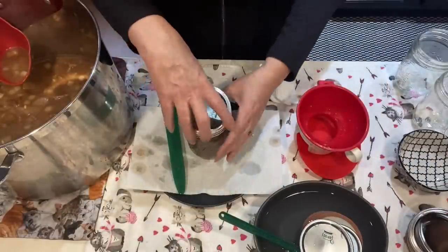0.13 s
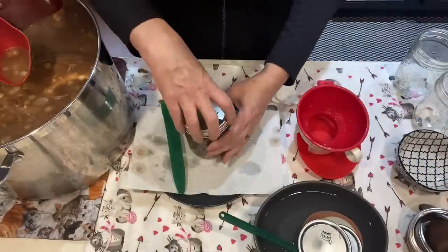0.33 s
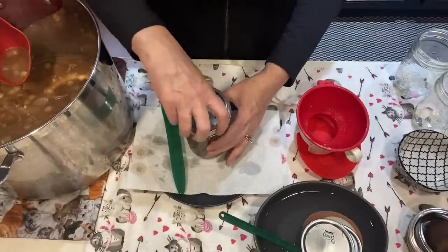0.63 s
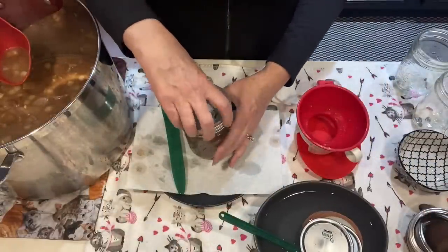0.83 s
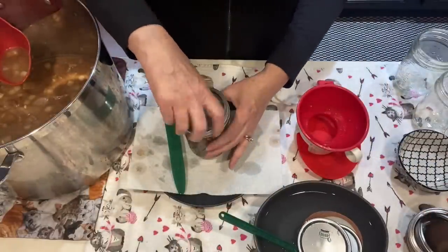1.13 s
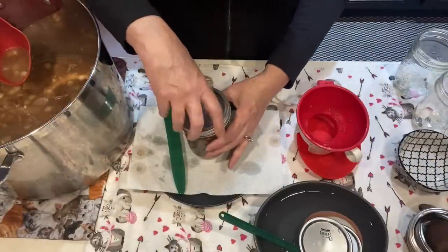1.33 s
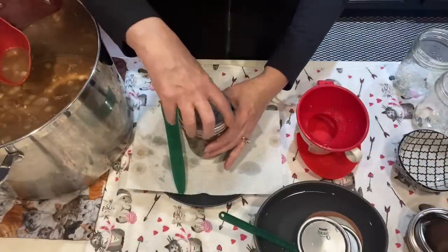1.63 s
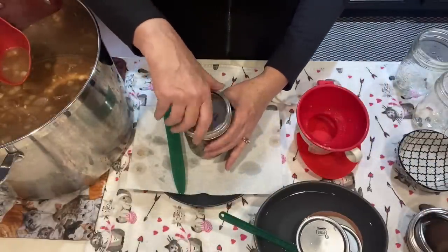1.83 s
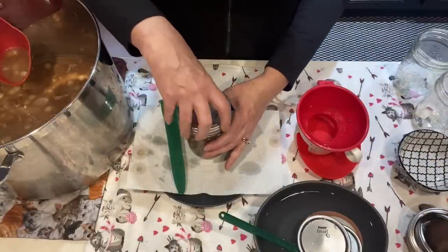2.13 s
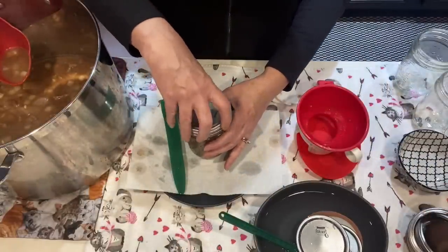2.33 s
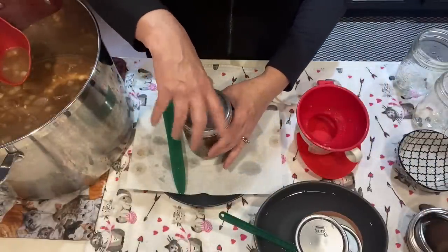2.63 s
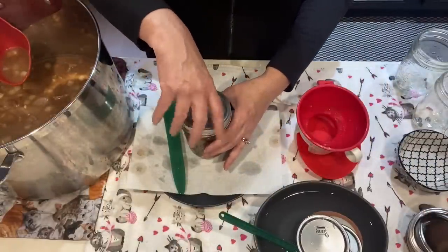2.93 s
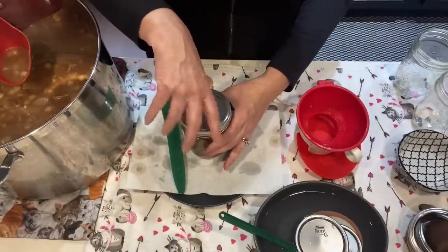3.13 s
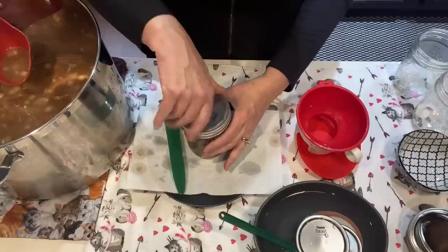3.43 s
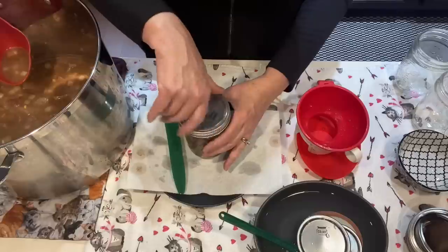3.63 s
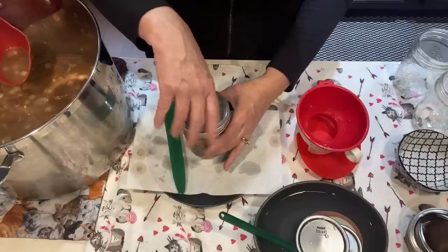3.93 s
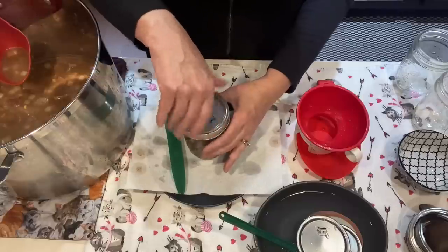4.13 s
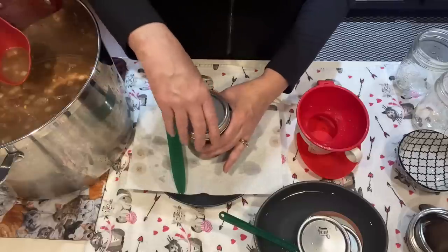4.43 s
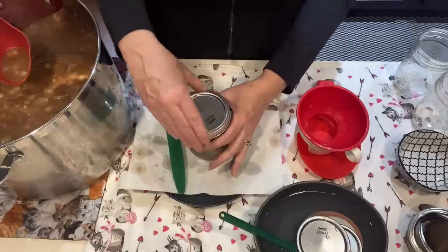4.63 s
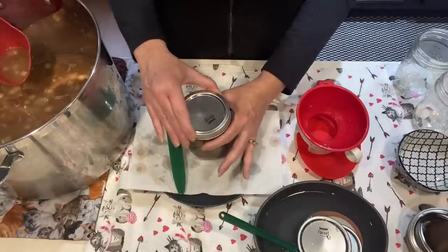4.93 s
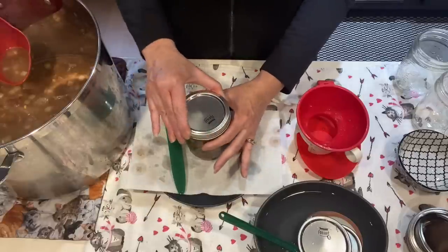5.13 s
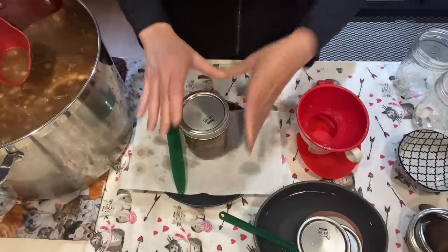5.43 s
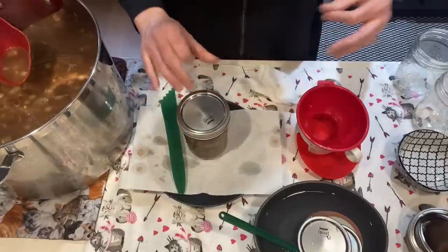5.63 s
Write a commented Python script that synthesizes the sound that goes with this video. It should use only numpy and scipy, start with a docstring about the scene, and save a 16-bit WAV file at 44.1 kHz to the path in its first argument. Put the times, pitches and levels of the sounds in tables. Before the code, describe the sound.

Quick metallic scrapes, clicks and soft thuds come from a lid being screwed onto a glass jar, while an appliance hums faintly.

```python
"""Short gritty scrapes and sharp ticks: a hand twists a metal screw band onto a full glass jar.
The band grates along the glass thread, ticks where it catches, knocks the flat lid and sometimes sings.
The jar rocks on a padded kitchen table with soft thuds. Near the end a fingernail flicks the rim
and fingertips stutter off it. A small room echoes, over the hum of an appliance and a low rumble."""
import sys
import numpy as np
from scipy import signal
from scipy.fft import rfft, irfft
from scipy.io import wavfile
from scipy.ndimage import uniform_filter1d

SR = 44100
rng = np.random.default_rng(int(sys.argv[2]) if len(sys.argv) > 2 else 0)


def digitize_waveform(pressure):
    """Quantize a signal to 16-bit integers and store it at the path in sys.argv[1].

    Rows of a 2-D input are taken as channels; values are limited to [-1, 1].
    """
    field = np.atleast_2d(pressure).T
    bounded = np.clip(field, -1, 1)
    quanta = np.round(bounded * 32767).astype(np.int16)
    wavfile.write(sys.argv[1], SR, quanta)


N = 255780

# Turns and touches of the hand:
# start_s, rise_ms, hold_ms, level_db, treble_tilt_db, lid_db, upper_lid_extra_db
TURNS = [(0, 0.92, 129, -55.5, -28, 3.5, 4.5), (0.32, 74, 5.9, -70.5, -29, 15.5, -3),
         (0.488, 130, 5.4, -50, -23, 0, -19), (.72, 30, 8.4, -62, -18, 6, -4),
         (0.958, 0.65, 102, -58, 4, 10.5, -9), (1.091, 108, 44, -39.5, -13, -5, 13),
         (1.432, 1, 29, -58, -19, 7.5, -9), (1.55, 7.8, 150, -55.5, -14, 3, -16),
         (1.685, 67, 174, -39.5, -11.5, -17, 16), (1.775, 2, 124, -54.5, -6.5, 6, 7),
         (2.068, 0.81, 82, -64, -16, 9, -3), (2.198, 4.6, 138, -65.5, -16, 8.5, 11),
         (2.31, 56, 8.3, -53.5, -26, 7, -18), (2.408, 89, 61, -36, 0, -13.5, 7),
         (2.701, 88, 39, -33, -3.5, -15, 6), (2.765, 2, 53, -47.5, -5.5, 3.5, 1),
         (2.95, 1.2, 83, -40, -15.5, -5, 7), (3.173, 11.4, 3.1, -26.5, 2, -11, 3),
         (3.375, 1, 69, -39.5, -8, -6.5, 0.5), (3.575, 18, 4, -37, -12, -2, -1.5),
         (3.795, 6.2, 14, -52, -6.5, 9.5, -9), (4.035, 1.34, 33, -60.5, 12, 8, -9.5),
         (4.29, 16.4, 3.5, -75.5, 9.5, 11, -3.5), (4.418, 3.9, 19, -65.5, -2, 1.5, -3),
         (4.538, 13, 10, -76, 3, 10, -2), (4.651, 18, 200, -68.5, -17, 4.5, -2.5),
         (5.07, 18.4, 88, -77.5, -0.5, -5.5, 2), (5.27, 64, 79, -83.5, 11, -5, 9)]
# Modes (the notes a thing rings at) of the band and of the lid: pitch_hz, width_hz, level_db
BAND_MODES = [(3100, 45, -2.5), (3520, 30, -6), (3790, 51, 2.5), (4373, 68, 0), (5010, 210, -5.5),
              (5824, 90, -7.5), (6590, 80, -1), (7050, 65, -4), (7630, 68, -5), (7800, 220, -6.5),
              (8254, 120, -1.5), (8900, 82, -2.5), (9820, 78, -5.5), (5190, 84, -6), (10720, 660, -9),
              (11440, 71, -9.5), (13300, 130, -19), (11800, 47, -13.5)]
LID_MODES = [(585, 21, -6.5), (654.3, 14, 1.5), (801.6, 13, -5), (926, 45, -2), (1008, 59, -4.5),
             (1115, 29, -13.5), (1378, 45, -12.5), (1486, 56, -11), (1862, 37, -12), (2179, 22, -1.5),
             (2100, 40, -5), (2504, 30, -11)]


def undb(db):
    """Turns decibels into a number to multiply by."""
    return 10 ** (np.asarray(db) / 20)


def level(x, db):
    """Sets the average (rms) level."""
    return x * undb(db) / np.sqrt(np.mean(x ** 2))


def ring(x, hz, width_hz):
    """Lets a sound ring at one pitch; a narrower width rings longer."""
    return signal.lfilter(*signal.iirpeak(hz, hz / width_hz, SR), x)


def ring_twice(x, hz, width_hz):
    """Keeps the sound around one pitch, with steeper edges."""
    return ring(ring(x, hz, width_hz), hz, width_hz)


def colour(x, curve):
    """Shapes bass and treble along points of pitch_hz, gain_db."""
    hz, db = np.transpose(curve)
    freqs = np.fft.rfftfreq(x.shape[-1], 1 / SR)
    return irfft(rfft(x) * undb(np.interp(np.log(freqs + 1), np.log(hz), db)), x.shape[-1])


def dull(x, top_hz=11400):
    """Takes off the highest treble, which rubbing and echoes have little of."""
    return signal.sosfilt(signal.butter(8, top_hz, fs=SR, output="sos"), x)


def wander(per_s):
    """A smooth random wobble, about 1 in size."""
    hold = int(SR / per_s)
    steps = np.repeat(rng.standard_normal(N // hold + 1), hold)
    return np.sqrt(2) * uniform_filter1d(uniform_filter1d(steps, hold), hold)[:N]


def room_air():
    """A soft rush of air, nearly the same in both ears in the bass."""
    air_spectrum = [(22, -32.5), (32, -11), (50, -6), (72, -6), (120, 0), (250, -5), (420, -3.5),
                    (600, -12.5), (1000, -19), (1600, -22.5), (2500, -37), (4000, -42.5), (8000, -47),
                    (13000, -52)]  # tone of the air: pitch_hz, gain_db
    ear_likeness = [(60, 0.99), (130, 0.99), (280, 0.934), (610, -0.48), (1310, -0.03), (2830, -0.1),
                    (6120, -0.18), (13200, -0.28)]  # how well left and right match: pitch_hz, likeness (-1 to 1)
    hz, alike = np.transpose(ear_likeness)
    mid, side = (colour(colour(rng.standard_normal(N), air_spectrum), np.c_[hz, 10 * np.log10(power)])
                 for power in (1 + alike, 1 - alike))
    return level(np.array([mid + side, mid - side]), -57) * undb(.8 * wander(8.7))


def appliance_hum():
    """An appliance hums on two wavering tones that swell a little."""
    hum_tones = [(119, -62, 2.5, 2), (459, -62, 1, 1)]  # pitch_hz, level_db, waver_hz, waver_db
    hum_swells = [(0, 1, -4.5), (1.399, 0.5, 0), (2.801, 1.4, -0.5), (4.201, -1, -1), (4.7, -1.5, 6),
                  (5.8, 2.5, -1.5)]  # time_s, low_tone_gain_db, high_tone_gain_db
    times, *swells = np.transpose(hum_swells)
    hum = 0
    for (hz, db, waver_hz, waver_db), swell in zip(hum_tones, swells):
        tone = np.sin(2 * np.pi * np.cumsum(hz + waver_hz * wander(9)) / SR)
        tone = level(tone * undb(waver_db * wander(9)), db)
        hum += tone * undb(np.interp(np.arange(N) / SR, times, swell))
    return hum


def low_rumble():
    """A deep noise that swells for a while."""
    rumble_swell = [(0, -77), (2.9, -62.5), (3.7, -54.5), (4.5, -58), (5.2, -65), (5.8, -58)]  # time_s, gain_db
    rumble = level(ring_twice(rng.standard_normal(N), hz=72, width_hz=30), -1.5)
    return rumble * undb(np.interp(np.arange(N) / SR, *np.transpose(rumble_swell)))


def room_echo(x):
    """Dense echoes off the walls, partly unlike left and right; the highest die fastest."""
    echo_bands = [(275, 0.44, -19, -17.5), (1210, 0.19, -19, -10.5), (2420, 0.56, -14, -1),
                  (5135, 0.14, -16.5, -10.5), (8900, 0.069, -4, 6.5)]  # pitch_hz, time_to_fall_60_db_s, gain_db, left_right_difference_db
    t = np.arange(SR // 2) / SR
    tail = 0
    for hz, fade_s, db, side_db in echo_bands:
        mid, side = ring_twice(rng.standard_normal((2, len(t))), hz, 2.3 * hz) * undb(-60 * t / fade_s)
        side *= undb(side_db)
        tail += level(np.array([mid + side, mid - side]), db)
    tail *= np.minimum(t / 0.0027, 1) / np.sqrt(len(t))
    return signal.fftconvolve(x[None], tail, axes=1)[:, :N]


def blows(hits, modes, octaves, crack_db, damping, hardness):
    """Each hit is a short push of noise: it cracks around its pitch and rings the modes near it."""
    lead, size, scatter_db = 1024, 8192, 3
    out = np.zeros(N + size)
    ms = (np.arange(size) - lead) / SR * 1000
    for peak_s, peak_db, hz, rise_ms, fall_ms in hits:
        mode_db = scatter_db * rng.standard_normal(len(modes))
        push = rng.standard_normal(size) * np.exp(np.minimum(ms / rise_ms, -ms / fall_ms))
        # a soft contact pushes little far above its pitch
        push = signal.sosfilt(signal.butter(2, min(hardness * hz, .4 * SR), fs=SR, output="sos"), push)
        rung = 0
        for (mode_hz, width_hz, db), chance_db in zip(modes, mode_db):
            near_db = -6 * (np.log2(mode_hz / hz) / octaves) ** 2
            rung += undb(db + near_db + chance_db) * ring(push, mode_hz, damping * width_hz)
        crack = ring_twice(push, hz, 1.7 * octaves * hz)
        blow = rung / np.abs(rung).max() + undb(crack_db) * crack / np.abs(crack).max()
        start = int(peak_s * SR) - lead
        out[start:start + size] += undb(peak_db) * blow / np.abs(blow).max()
    return out[:N]


def table_thuds(rise_ms=3, fall_ms=10):
    """The jar rocks and thuds on the padded table."""
    thud_hits = [(0.963, -43.5, 455), (1.028, -41, 210), (1.105, -45.5, 198), (1.791, -40, 450),
                 (1.875, -39, 228), (2.068, -44, 360.4), (2.29, -41, 200), (2.509, -39, 230),
                 (2.771, -40, 217.6), (2.968, -36.5, 251), (3.21, -38.5, 219), (3.375, -46, 202.2),
                 (3.42, -35.5, 262), (3.579, -33.5, 295), (3.62, -38.5, 240), (3.82, -34.5, 242),
                 (4.037, -39, 194)]  # time_s, peak_db, pitch_hz
    table_modes = [(190, 60, -5), (240, 60, -4), (355.2, 190, -4)]  # the table's low notes: pitch_hz, width_hz, level_db
    hits = [(*row, rise_ms, fall_ms) for row in thud_hits]
    return blows(hits, table_modes, octaves=0.46, crack_db=-3, damping=0.44, hardness=1.6)


def finger_stutter(pitch_hz=7400, rise_ms=.2, fall_ms=.8):
    """Fingertips stutter off the rim in faint clicks."""
    finger_slips = [(5.093, -61), (5.1094, -65), (5.1389, -53.5), (5.16, -55), (5.179, -52.5), (5.188, -61),
                    (5.1978, -59), (5.212, -64), (5.3127, -65)]  # time_s, peak_db
    hits = [(*row, pitch_hz, rise_ms, fall_ms) for row in finger_slips]
    return blows(hits, BAND_MODES, octaves=0.5, crack_db=3, damping=3.4, hardness=2)


def nail_flick():
    """A fingernail flicks the rim: nearly all crack, little ring."""
    flick_hit = [(4.7995, -36, 3240, 0.077, 0.89)]  # time_s, peak_db, pitch_hz, rise_ms, fall_ms
    return blows(flick_hit, BAND_MODES, octaves=2.4, crack_db=26, damping=3.8, hardness=4.8)


def lid_knocks(rise_ms=.6, fall_ms=3.6):
    """The band knocks the flat lid and makes it ring."""
    knock_hits = [(.0656, -43, 1390), (.104, -36, 990), (0.5836, -41, 1030), (.62, -51, 1150),
                  (0.763, -48.5, 990), (.961, -34, 930), (0.9955, -36.5, 1420), (1.0292, -36.5, 910),
                  (1.048, -34.5, 860), (1.104, -27, 960), (1.123, -36, 980), (1.147, -26, 1050),
                  (1.1937, -20, 1215), (1.205, -22.5, 1080), (1.22, -29, 2500), (1.461, -58, 1350),
                  (1.4787, -35.5, 1050), (1.5011, -40.5, 663), (1.686, -39.5, 1400), (1.7767, -30, 790),
                  (1.793, -43, 1080), (1.8265, -23.5, 1090), (1.832, -27, 2100), (1.839, -29.5, 920),
                  (1.8686, -27, 1220), (2.0753, -34.5, 672), (2.2211, -32, 970), (2.2586, -39, 1050),
                  (2.286, -31, 1430), (2.2984, -28.5, 870), (2.3484, -40.5, 950), (2.5105, -31.5, 810),
                  (2.766, -26, 1150), (2.7861, -28.5, 750), (2.9742, -33.5, 970), (3.0336, -34, 1170),
                  (3.1903, -35, 1850), (3.374, -37.5, 1370), (3.414, -32.5, 885), (3.487, -45, 1100),
                  (3.5785, -38, 710), (3.6045, -35.5, 880), (3.6194, -36, 1160), (3.625, -40, 2100),
                  (3.8068, -35.5, 950), (4.043, -43.5, 990), (4.0651, -42.5, 1530), (4.8, -48, 1770)]  # time_s, peak_db, pitch_hz
    hits = [(*row, rise_ms, fall_ms) for row in knock_hits]
    return blows(hits, LID_MODES, octaves=0.23, crack_db=-7, damping=1.3, hardness=2.4)


def metal_singing(width_share=0.043):
    """Rubbed metal sticks and slips on one rough note, which glides up as the band bears down."""
    sung_notes = [(1.105, 139, 900, 1033, -38.5), (1.78, 67, 849, 981, -37), (2.2, 104, 919, 957, -53),
                  (2.965, 30, 4700, 4780, -37)]  # start_s, length_ms, first_hz, last_hz, level_db
    out = np.zeros(N)
    for start_s, length_ms, first_hz, last_hz, db in sung_notes:
        size = int(length_ms / 1000 * SR)
        progress = np.linspace(0, 1, size)
        phase = 2 * np.pi * np.cumsum(first_hz + (last_hz - first_hz) * progress) / SR
        noise = rng.standard_normal((2, SR))[:, :size]
        rough = uniform_filter1d(noise, int(SR / width_share / last_hz))
        note = level(rough[0] * np.cos(phase) + rough[1] * np.sin(phase), db)
        start = int(start_s * SR)
        out[start:start + size] += note * np.sin(np.pi * progress ** 2.4) ** .5
    return out


def thread_catches(tick_rise_ms=0.66, surge_rise_ms=8.7, surge_fall_ms=7.4):
    """The band ticks where it catches on the thread, and the grating surges where it binds."""
    tick_hits = [(0.065, -39, 4610, 1.7), (0.1014, -33.5, 4540, 6.5), (0.231, -54.5, 7400, 2),
                 (.262, -58, 7350, 2), (0.347, -53.5, 6700, 1.8), (0.41, -45, 4300, 0.81),
                 (0.507, -48, 4400, 1.8), (.539, -30, 5600, 1.8), (0.582, -30.5, 7000, .75),
                 (0.9615, -35, 4280, 3.6), (0.9972, -39, 4160, 1.4), (1.028, -26.5, 4200, 3.5),
                 (1.0467, -42, 5240, 18), (1.0846, -37, 4510, 2.1), (1.104, -29.5, 5260, 3.4),
                 (1.113, -31.5, 4730, 14), (1.129, -32.5, 4300, 20), (1.2019, -20, 6980, 8.9),
                 (1.25, -31.5, 6800, 19), (1.4388, -44, 5050, 1.6), (1.479, -43, 4030, 11),
                 (1.5536, -32.5, 6300, 4.3), (1.562, -35, 5940, 3), (1.6368, -38, 4720, 2.1),
                 (1.685, -20, 6960, 2.2), (2.104, -36.5, 5800, 2.5), (2.2, -54, 7200, 2.5),
                 (2.2174, -42, 4550, 4.4), (2.264, -45, 5000, 4.7), (2.287, -48, 4550, 0.87),
                 (2.2956, -32, 5660, 5.3), (2.3208, -24, 5200, 1.5), (2.3453, -26, 8200, 2.5),
                 (2.355, -27.5, 5340, 3.6), (2.702, -38, 7000, 3.6), (2.7195, -34.5, 5840, 5.9),
                 (2.741, -22.5, 7140, 2), (2.9508, -26.5, 7960, 2.5), (2.9626, -32, 5000, 2.6),
                 (3.1899, -8, 6000, 4.2), (3.374, -13.5, 6340, 2.55), (3.585, -34.5, 6020, 2.3),
                 (3.8039, -34.5, 5210, 4.7), (4.0427, -50, 5300, 2.6), (4.0606, -39, 5600, 5.2),
                 (4.111, -47.5, 5420, 1.4), (4.302, -61, 5000, 2.2)]  # time_s, peak_db, pitch_hz, fall_ms
    surge_hits = [(1.1583, -32.5, 4400), (1.7498, -36, 6170), (1.7835, -28, 6340), (1.8329, -20.5, 5960),
                  (1.8871, -19, 7400), (2.52, -26, 6270), (2.584, -27, 8040), (2.7897, -23, 7990),
                  (2.8372, -32.5, 4870), (2.8568, -32.5, 6710), (2.9898, -20.5, 6250), (3.0086, -28, 6450),
                  (3.19, -22.5, 5980), (3.032, -23, 6500), (3.4033, -33, 5930), (3.4233, -28, 7400),
                  (3.6223, -26.5, 6300), (3.8238, -37, 5670)]  # time_s, peak_db, pitch_hz
    hits = [(s, db, hz, tick_rise_ms, fall_ms) for s, db, hz, fall_ms in tick_hits]
    hits += [(*row, surge_rise_ms, surge_fall_ms) for row in surge_hits]
    return blows(hits, BAND_MODES, octaves=0.47, crack_db=7, damping=1.5, hardness=3.2)


def tiny_slips(per_s, spread_db):
    """Tiny slips of uneven size as metal drags over glass."""
    slipping = rng.random(N) < per_s / SR
    return slipping * rng.standard_normal(N) * undb(spread_db * np.minimum(rng.exponential(size=N), 3))


def rubbed_lid(slips, modes, swing_db, per_s):
    """Each mode of the lid is fed more or less as the point of contact travels."""
    return sum(undb(db) * ring(slips * undb(swing_db * np.tanh(wander(per_s))), hz, width_hz)
               for hz, width_hz, db in modes)


def gripped_band(slips, shift_share=.03, grip_db=7):
    """Each new grip bends the thin band: its modes shift, and the fingers damp some more than others."""
    out = np.zeros(N)
    edges = [int(turn[0] * SR) for turn in TURNS] + [N]
    grips = rng.standard_normal((len(TURNS), 2, len(BAND_MODES)))
    feeds = [slips * undb(5 * np.tanh(wander(30.08))) for _ in BAND_MODES]
    for start, end, (shifts, weights) in zip(edges, edges[1:], grips):
        rung = 0
        for (hz, width_hz, db), feed, shift, weight in zip(BAND_MODES, feeds, shifts, weights):
            mode = ring(feed[start:end], hz * (1 + shift_share * shift), width_hz)
            rung += undb(db + grip_db * np.tanh(weight)) * mode
        out[start:end] = level(rung, -2.5)
    return out


def hand_force(onset_db=-12.5, release_db_per_s=201.5, tight_s=4.2):
    """Each turn builds, holds and dies away: one loudness curve for each of the five grating layers."""
    t = np.arange(N) / SR
    force = np.zeros((5, N))
    for start_s, rise_ms, hold_ms, db, tilt_db, lid_db, upper_db in TURNS:
        full_s = start_s + max(rise_ms, 1) / 1000
        rising_db = onset_db * np.clip((full_s - t) / (full_s - start_s), 0, 1)
        dying_db = release_db_per_s * np.maximum(t - full_s - hold_ms / 1000, 0)
        band_db = -4.5 if start_s < tight_s else -6.5  # the band rings less once screwed down
        shares = undb([-tilt_db / 2, tilt_db / 2, band_db, lid_db, lid_db + upper_db])
        force += shares[:, None] * (t >= start_s) * undb(db + rising_db - dying_db)
    return uniform_filter1d(force, size=128)


def band_grating():
    """The band drags along the glass: its slips are heard as grit and set the band and lid ringing."""
    grit_spectrum = [(300, -39), (600, 5), (1000, -15.5), (1600, -0.5), (2200, -4.5), (3000, -7),
                     (5000, -6), (8000, -7), (10500, -5.5), (13500, -20)]  # tone of metal on glass: pitch_hz, gain_db
    slips = tiny_slips(3000, spread_db=2.5) * undb(2.7 * wander(70))
    grit = colour(slips, grit_spectrum)
    bright, top = (signal.sosfiltfilt(signal.butter(2, hz, "high", fs=SR, output="sos"), grit)
                   for hz in (2800, 6500))
    grit_gain = undb(-13.5) / np.sqrt(np.mean(bright ** 2))
    band = gripped_band(slips)
    coarse = tiny_slips(1200, spread_db=4)
    low_grit = level(grit - bright, -8)
    low_lid = level(rubbed_lid(coarse, LID_MODES[:8], swing_db=5, per_s=22), -6.5)
    upper_lid = level(rubbed_lid(coarse, LID_MODES[8:], swing_db=7, per_s=16), -11)
    layers = [grit_gain * (bright - top), grit_gain * top, band, low_grit + low_lid, upper_lid]
    return dull(sum(force * layer for force, layer in zip(hand_force(), layers)))


def scene():
    """The jar, almost in the middle, with its echo and the kitchen behind it."""
    jar = thread_catches() + lid_knocks() + table_thuds() + finger_stutter() + nail_flick()
    jar += band_grating() + metal_singing()
    direct = jar * undb([[.1], [-.1]])  # left, right
    return direct + dull(room_echo(jar)) + room_air() + appliance_hum() + low_rumble()


def record(dry):
    """A phone above the jar steeply cuts the treble over 13300 Hz."""
    return signal.sosfilt(signal.ellip(6, .5, 45, 13300, fs=SR, output="sos"), dry)


dry = scene()
out = record(dry)
digitize_waveform(out)
```